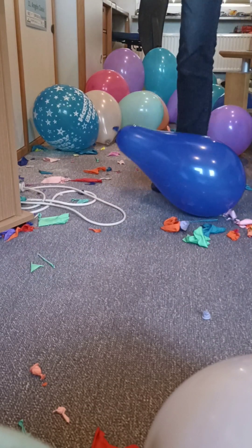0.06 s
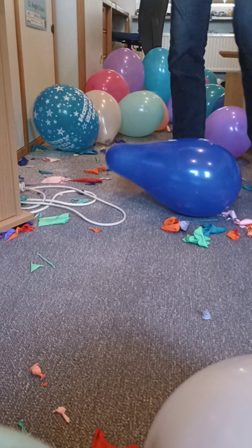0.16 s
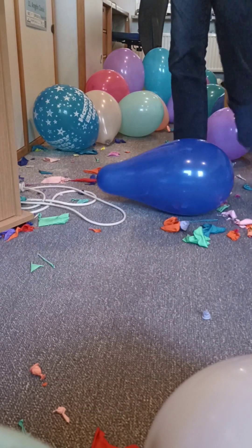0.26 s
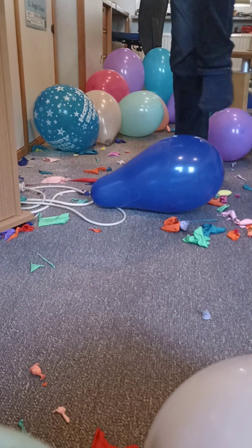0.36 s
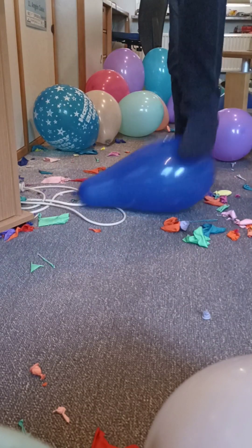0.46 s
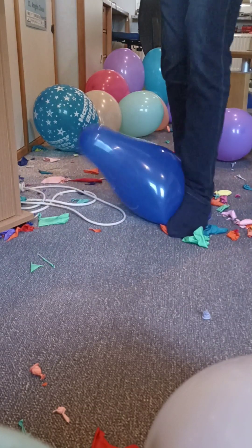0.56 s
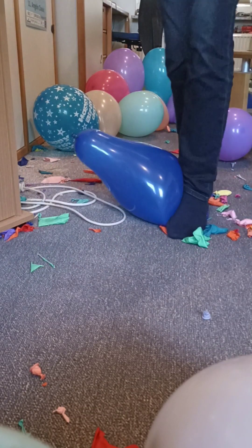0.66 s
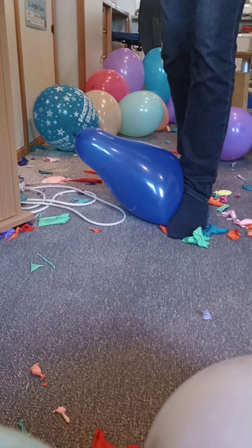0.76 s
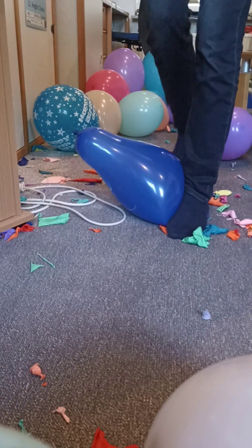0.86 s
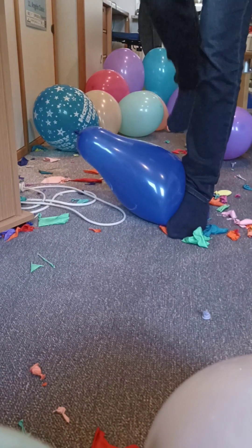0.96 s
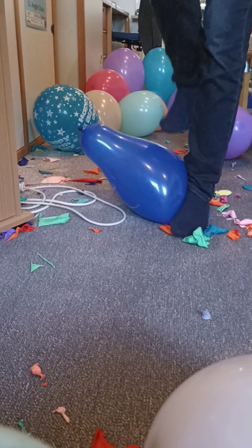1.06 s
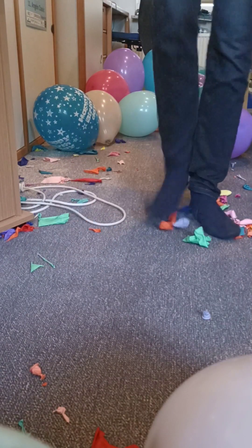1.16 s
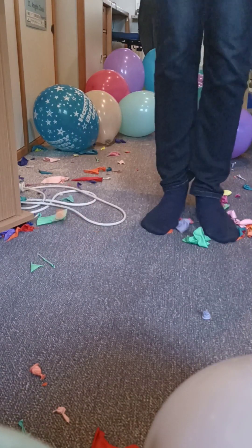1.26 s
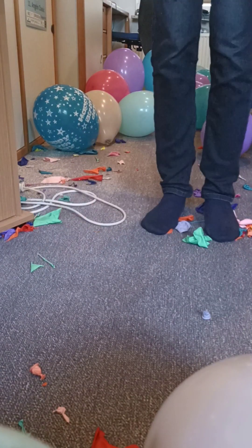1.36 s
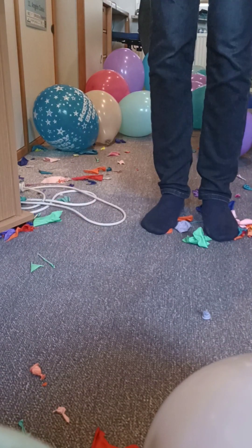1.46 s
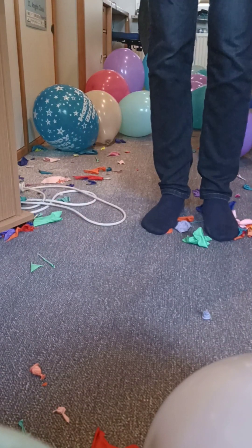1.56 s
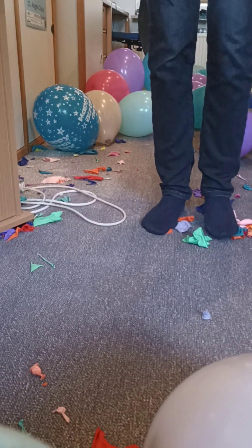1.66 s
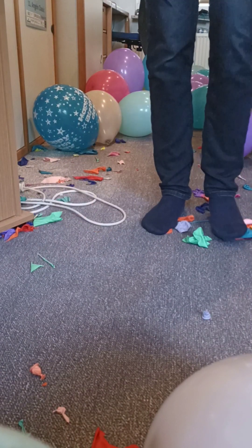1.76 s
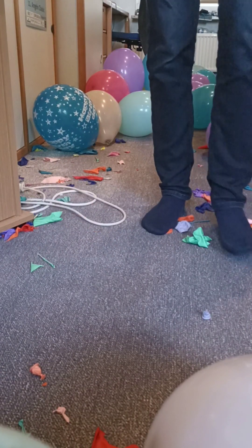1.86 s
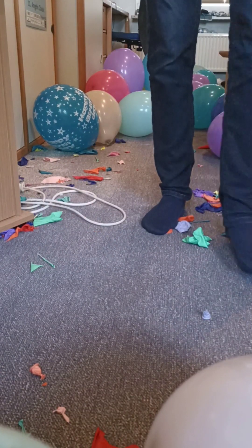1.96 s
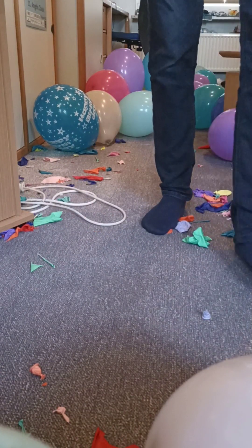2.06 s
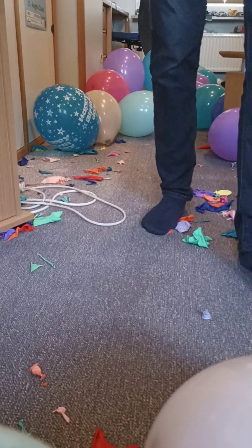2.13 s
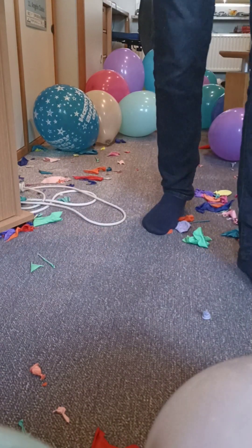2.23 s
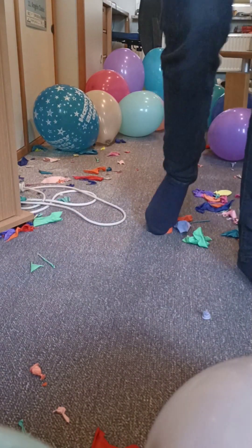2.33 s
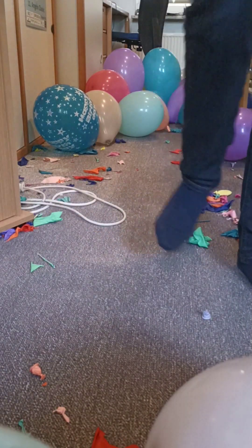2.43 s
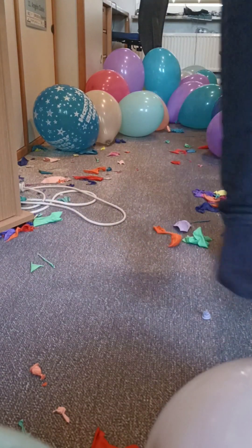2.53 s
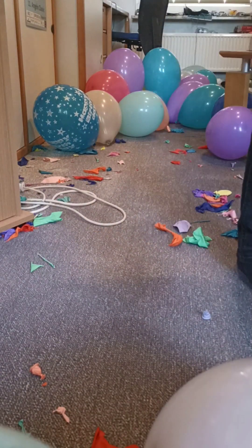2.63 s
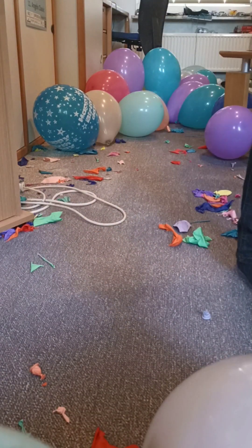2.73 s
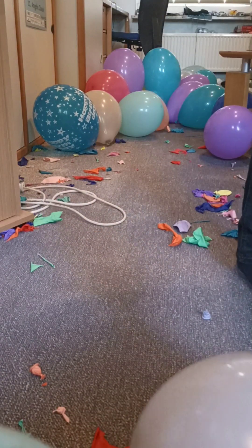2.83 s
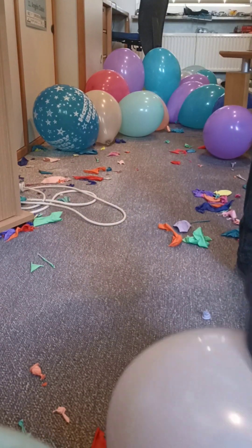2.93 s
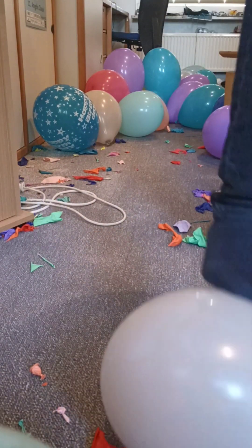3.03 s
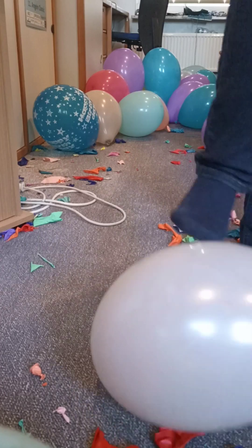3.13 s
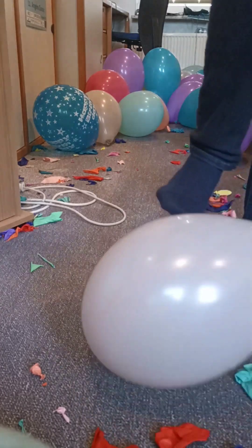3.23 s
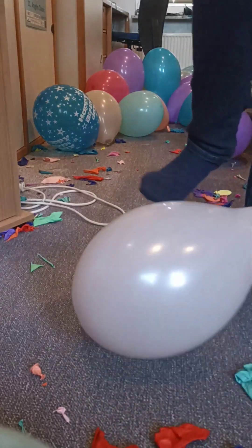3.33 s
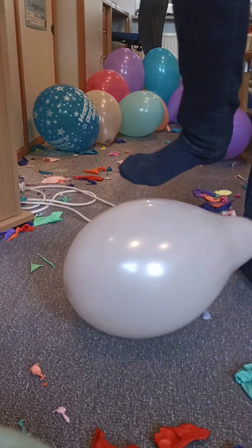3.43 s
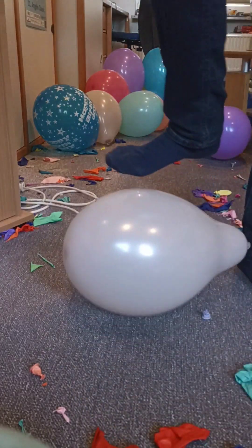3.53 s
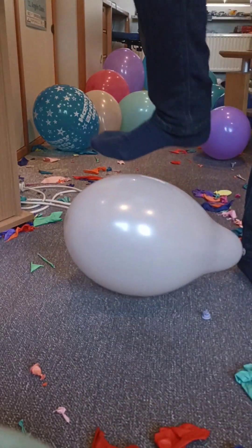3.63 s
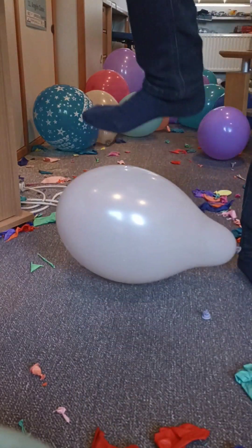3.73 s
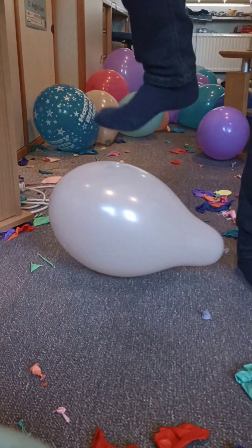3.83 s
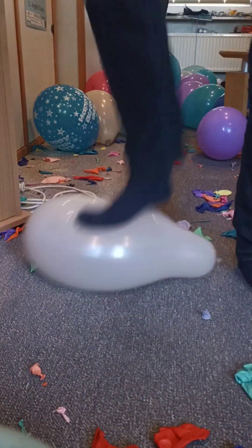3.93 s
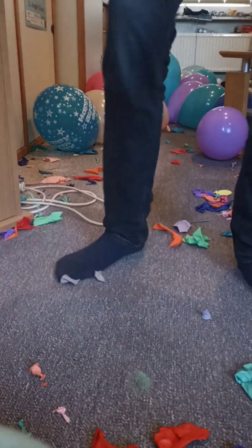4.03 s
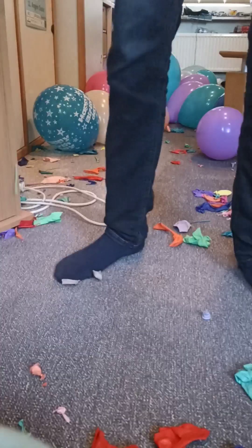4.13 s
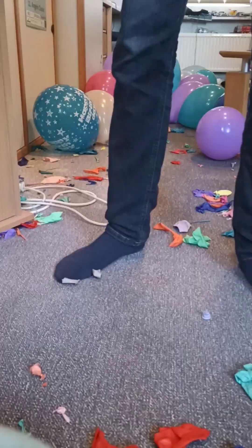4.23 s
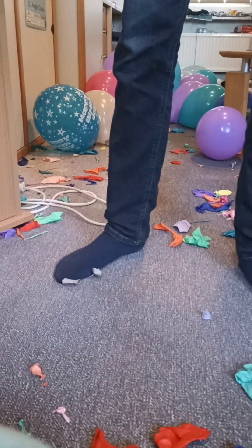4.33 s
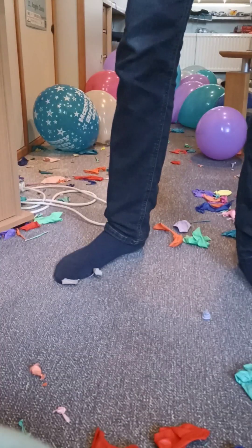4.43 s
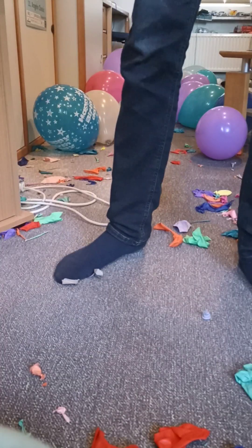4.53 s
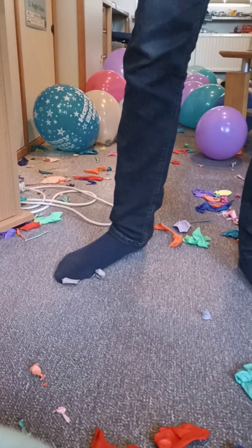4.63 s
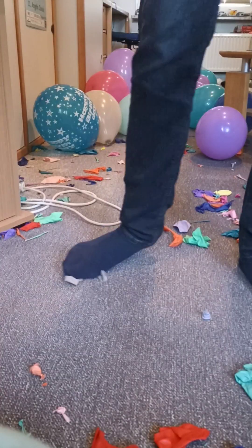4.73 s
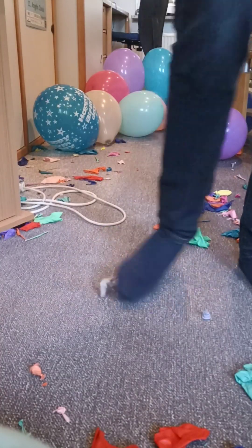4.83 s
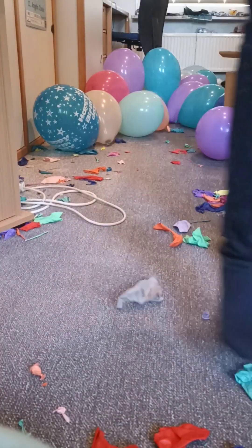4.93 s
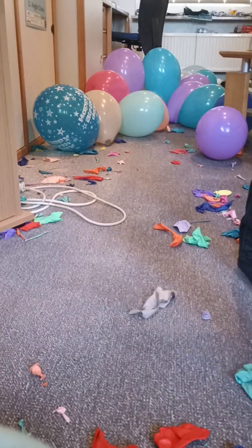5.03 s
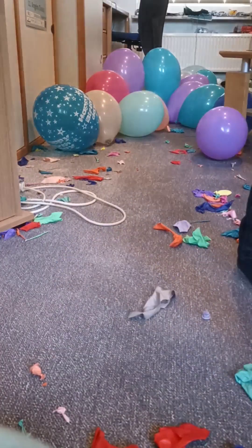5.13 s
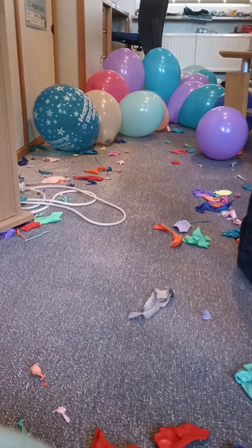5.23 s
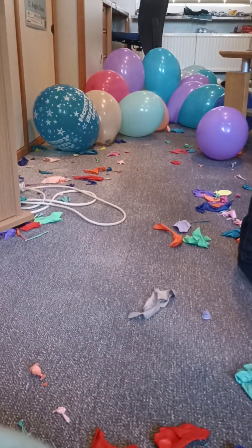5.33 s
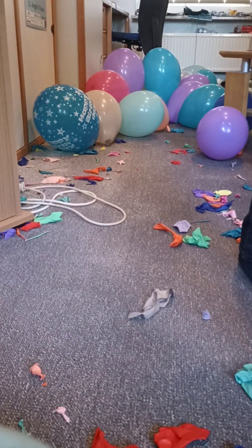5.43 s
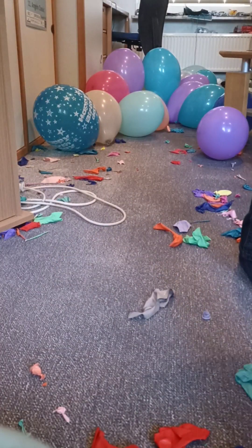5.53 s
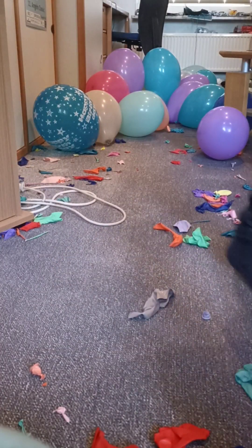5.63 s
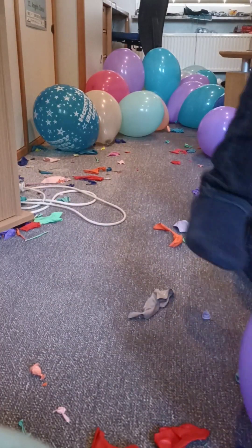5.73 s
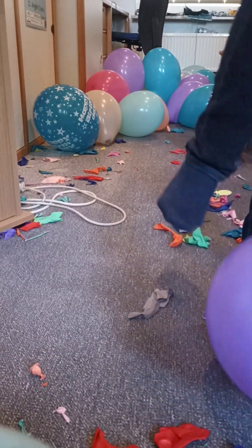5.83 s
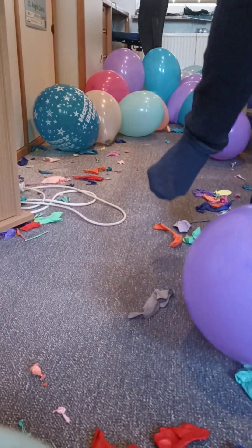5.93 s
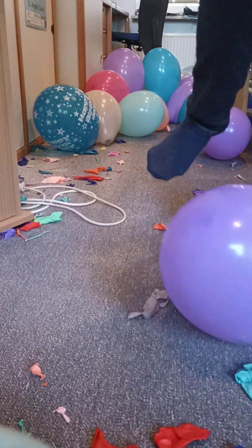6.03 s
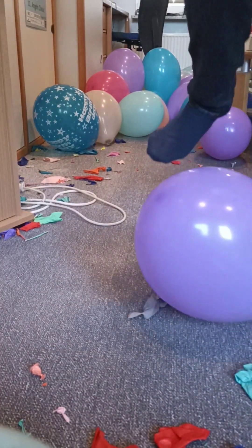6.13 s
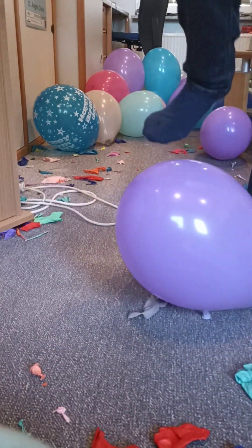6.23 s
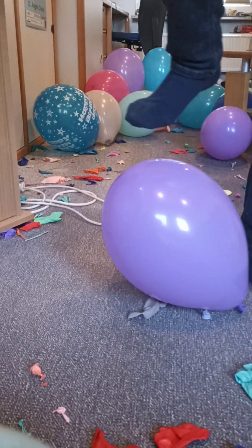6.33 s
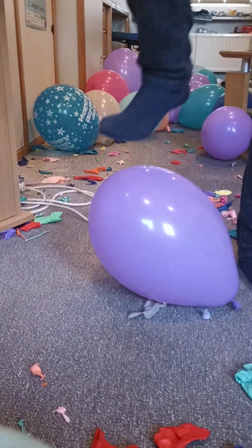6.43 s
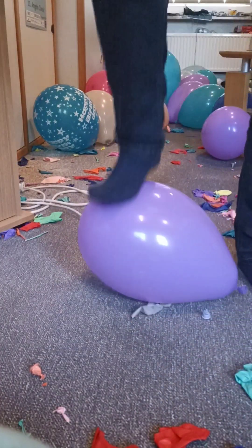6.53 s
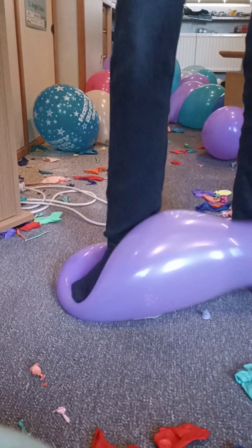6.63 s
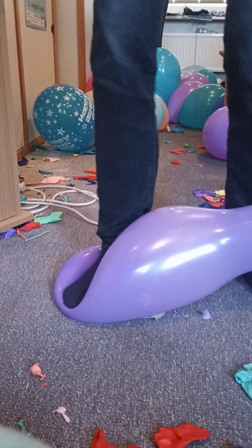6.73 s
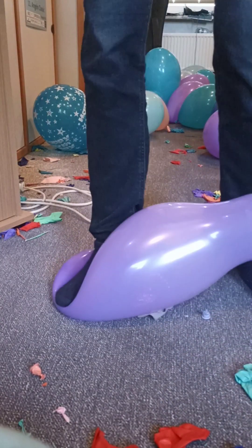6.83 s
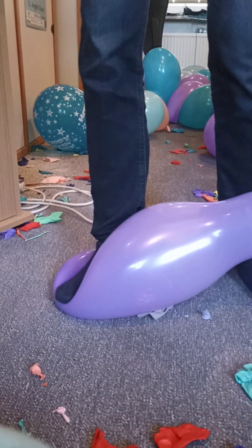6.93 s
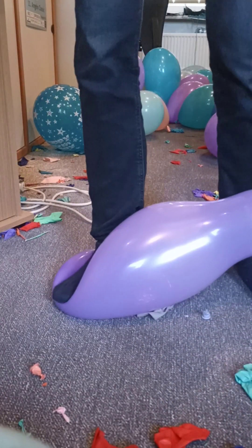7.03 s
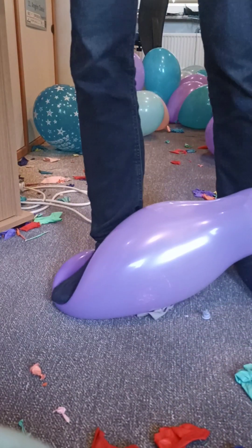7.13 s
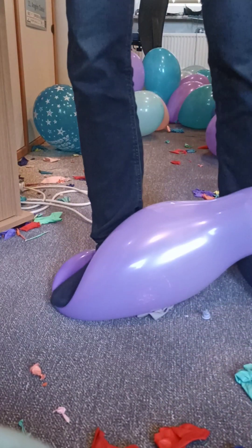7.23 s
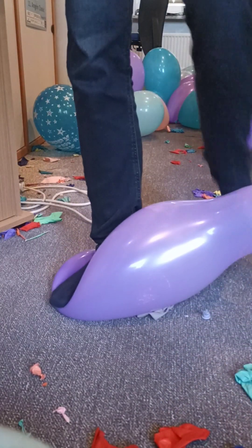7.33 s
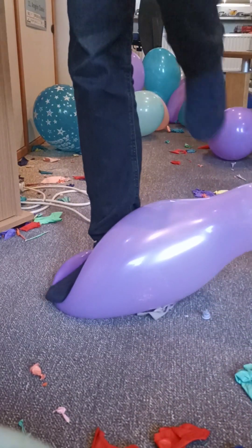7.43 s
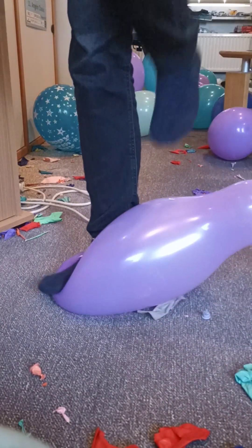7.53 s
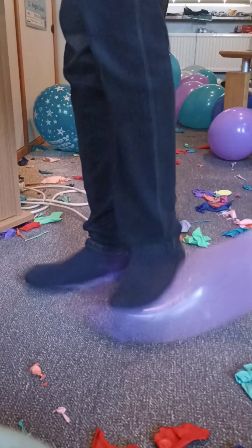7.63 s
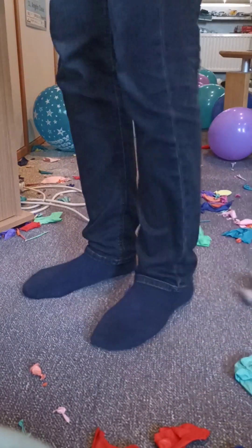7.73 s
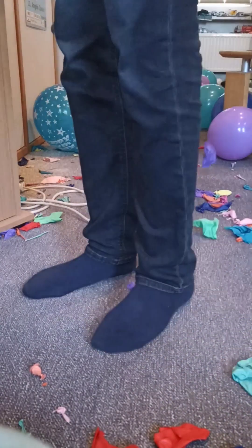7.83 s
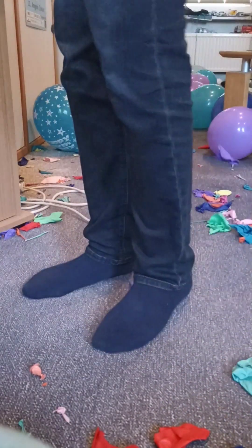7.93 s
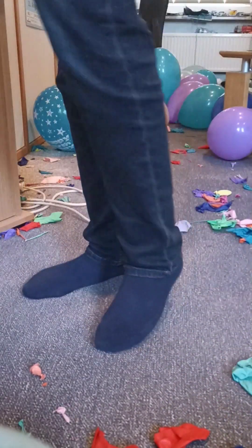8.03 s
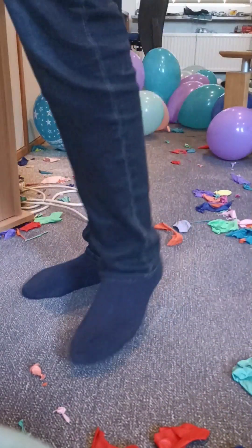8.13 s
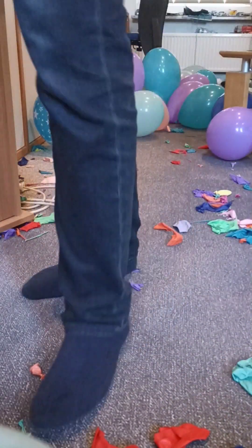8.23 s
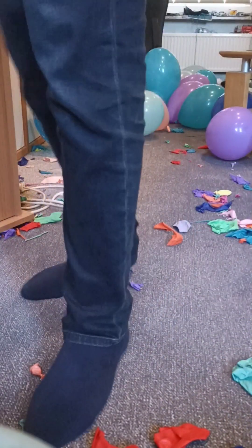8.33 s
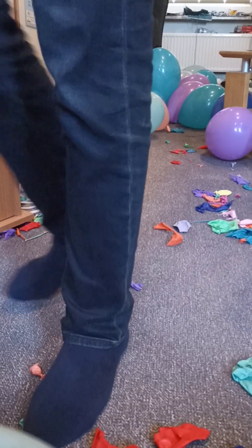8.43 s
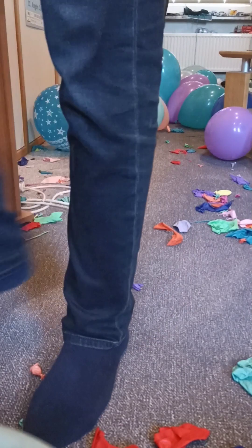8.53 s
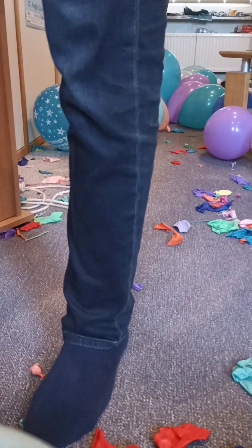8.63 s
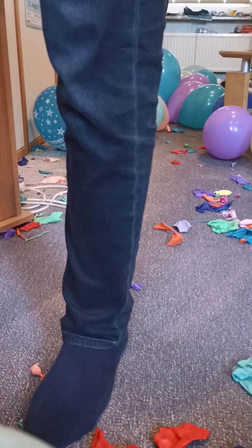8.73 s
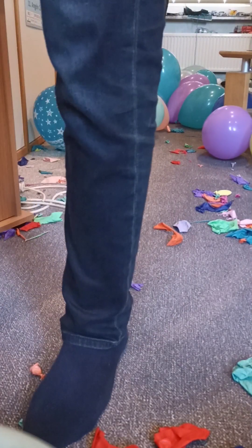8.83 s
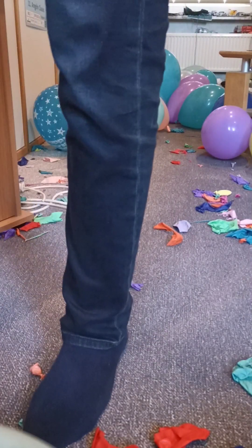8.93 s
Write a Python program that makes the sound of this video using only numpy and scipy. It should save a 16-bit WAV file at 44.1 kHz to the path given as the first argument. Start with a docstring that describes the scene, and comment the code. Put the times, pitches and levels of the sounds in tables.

```python
"""Three balloons trodden to bursting

A small carpeted room, heard by a microphone with two close ports: feet in socks tread on three balloons.
Blows are short booms with a slap of noise; dragged rubber and swishing cloth are trains of tiny jerks.
Each bang is a pressure step and a burst of room noise that overloads the input, and ringing tones
leave the other balloons humming. Single rubber snaps and a run of faint chirps lie over still air."""
import sys
import numpy as np
from scipy import signal
from scipy.fft import rfft, irfft
from scipy.io import wavfile
from scipy.ndimage import uniform_filter1d

SR = 44100
rng = np.random.default_rng(int(sys.argv[2]) if len(sys.argv) > 2 else 0)


def to_wav(sig):
    """Store sig (one row per channel, or 1-D mono) as 16-bit WAV at the path in sys.argv[1].

    Samples outside -1..1 are clipped; the rate is SR.
    """
    pcm = np.clip(np.atleast_2d(sig), -1, 1) * 32767
    pcm = np.round(pcm).astype(np.int16)
    wavfile.write(sys.argv[1], SR, pcm.T)  # frames by channels


N = 396459
TIME = np.arange(N) / SR

# Still air of the room: (frequency [Hz], level [dB])
HUSH_SPECTRUM = [(32, -40.5), (55, -13.5), (153, -1.5), (257, -9.5), (444, -8.5), (804, -19.5), (1890, -20),
                 (2510, -26.5), (3110, -21), (3760, -28), (8840, -36), (10900, -33), (12300, -27),
                 (16000, -34.5)]
# Decay of the late tail, before each source's damping: (frequency [Hz], time to fall 60 dB [s])
ROOM_DECAY = [(60, 0.31), (150, 0.61), (300, 0.5), (480, 0.48), (1000, 0.45), (3000, 0.43), (6000, 0.46),
              (15000, 0.26)]
# How alike the two ports hear diffuse sound: (frequency [Hz], left-right correlation [-1 to 1])
PORT_LIKENESS = [(30, 0.68), (110, .86), (300, 0.76), (450, 0.96), (650, 0.025), (1500, 0), (16000, 0.28)]
# Colour of the microphone ports: (frequency [Hz], left minus right [dB])
PORT_BALANCE = [(150, -0.5), (330, -1), (620, -6), (1150, 1.5), (2300, -3), (4500, -1.5), (8000, -5.5),
                (11000, 5.5), (15000, 7.5)]
# Socks and jeans brushing as a leg swings:
# (time at the fastest [s], spread [s], rustle before trim [dB], fizz [dB])
SWISHES = [(0.046, 0.022, -59, -72), (0.186, 0.059, -60.5, -76), (0.821, 0.017, -55, -48.5),
           (1.762, 0.028, -59, -80), (1.897, .04, -59.5, -81), (2.465, 0.04, -56.5, -56),
           (3.078, 0.082, -55, -60.5), (4.847, 0.049, -51.5, -65), (5.166, 0.13, -66.5, -74),
           (5.52, .09, -54.5, -59), (6.073, 0.013, -70.5, -66), (8.194, 0.013, -60, -52),
           (8.409, .04, -55.5, -66), (8.564, 0.19, -63.5, -76), (8.967, .04, -61.5, -63.5)]
# Rustle of the cloth: (frequency [Hz], level [dB])
CLOTH_SPECTRUM = [(200, 20.5), (600, 11.5), (1300, 10.5), (3200, 12.5), (4500, 8.5), (7000, 3),
                  (10500, -1.5), (12500, 3.5), (16000, -83.5)]
# Fizz of the finest fibres: (frequency [Hz], level [dB])
FIZZ_SPECTRUM = [(3000, -32), (7000, -8), (10500, -10.5), (12500, 2.5), (16000, -11)]
# Snaps of slipping rubber and scraps: (time [s], peak level [dB], centre frequency [Hz])
SNAPS = [(0.574, -22.5, 8000), (0.612, -30, 1510), (1.141, -16, 3220), (1.179, -25, 12400),
         (5.121, -36.5, 3370), (6.230, -49.5, 4000), (6.807, -31.5, 2000), (6.914, -23, 2680),
         (7.037, -26.5, 3170), (7.65, -37, 2500), (8.126, -35, 1780), (8.872, -38.5, 6000)]
# Strokes of rubber dragged under the foot:
# (time at full grip [s], build-up [s], hold [s], groan before trim [dB], creak before trim [dB])
RUBS = [(0.554, 0.0064, 0.16, -22.5, -42.5), (0.615, .006, 0.018, -38, -35.5),
        (0.924, 0.032, 0.28, -53.5, -64), (1.149, 0.016, 0.17, -29, -33.5), (1.887, .02, 0.48, -58, -70.5),
        (2.874, 0.00597, 0.084, -52, -60.5), (3.014, 0.062, 0.12, -49, -56),
        (3.971, 0.0019, 0.047, -32, -50.5), (4.041, 0.015, .004, -7.5, -30),
        (5.399, 0.0037, 0.069, -38, -54.5), (5.666, 0.15, .005, -43.5, -57),
        (6.592, .002, 0.084, -29.5, -49.5), (6.673, 0.012, 0.054, -19, -32.5),
        (6.816, 0.045, 0.13, -40.5, -45), (7.035, .04, 0.044, -41.5, -50), (7.166, 0.05, 0.1, -43.5, -55),
        (7.298, 0.041, 0.056, -43, -49.5), (7.629, 0.15, 0.016, -36, -45), (7.654, .003, 0.12, -15, -33.5),
        (8.483, 0.042, 0.43, -58, -72), (8.928, .01, .07, -47, -61.5)]
# Groan of the air in the balloon: (frequency [Hz], level [dB])
GROAN_SPECTRUM = [(40, -26), (85, -2), (250, 1), (470, -1), (620, -11), (850, -19.5), (2000, -47.5)]
# Creak of the balloon's skin: (frequency [Hz], level [dB])
SKIN_SPECTRUM = [(300, -18.5), (750, -3.5), (1100, 4.5), (1600, -2.5), (2300, -1), (3400, -3),
                 (3900, -10.5), (7000, -16), (10500, -16.5), (12500, -7), (16000, -22.5)]
# Blows of foot and balloon on the floor:
# (time [s], level [dB], pitch of the boom [Hz], slap against boom before trim [dB])
THUMPS = [(0.021, -39.5, 154, -6.5), (0.413, -45, 92, 3), (0.528, -25, 144, -0.5),
          (0.546, -13.5, 194, -3.5), (0.563, -9, 99.4, -2.5), (0.592, -21, 259, 4.5),
          (0.643, -13, 138, -10), (0.697, -19, 194, -8.5), (1.176, -16.5, 187, -20),
          (1.217, -12, 128.3, -3.5), (1.885, -42.5, 450, 2), (2.251, -43.5, 363, -18.5),
          (2.854, -37, 135.2, 5), (3.005, -44, 335.8, 2.5), (3.561, -39, 112, -6.5), (3.973, -24, 233, -3),
          (4.009, -12.5, 190, -4), (4.02, -9, 123, -6), (4.039, -9.5, 442, 1), (5.397, -27.5, 267, -7),
          (5.41, -19.5, 120.6, -9.5), (5.464, -23.5, 92, -8.5), (6.044, -38, 237.4, -0.5),
          (6.128, -44, 239, -1.5), (6.584, -23, 145, -7.5), (6.621, -13.5, 106, -10),
          (6.664, -10.5, 149, 4), (6.683, -2, 101.5, -9.5), (7.302, -33, 205, 1), (7.651, -8, 171.4, -3),
          (8.905, -31.5, 119, -4)]
# Slap on the carpet: (frequency [Hz], level [dB])
SLAP_SPECTRUM = [(25, -15.5), (60, -6.5), (100, 0), (200, 0.5), (450, -4.5), (600, -11), (800, -20.5),
                 (1300, -23.5), (3000, -41), (12000, -52)]
# Bursts: (time [s], level [dB], bass lift [dB], treble lift [dB], build-up of the room's boom [s],
# time the room stays full [s], ringing against the bang [dB])
BURSTS = [(1.2329, -4, 8, -1, 0.0022, 0.018, -8.5), (4.0539, -0.5, 1.5, -7, 0.052, 0.074, 3),
          (7.7076, 0.5, 0, -5, 0.014, 0.06, -1)]
# Noise of a bang: (frequency [Hz], level [dB])
BANG_SPECTRUM = [(45, -29.5), (110, -17), (240, -11), (330, -5), (460, 2), (600, -3.5), (720, -11.5),
                 (1200, -13.5), (2400, -17), (3150, -15), (4000, -20.5), (9500, -26.5), (12500, -21),
                 (16000, -29)]
# What rings on after a bang, the room briefly and the loose balloons for long:
# (frequency [Hz], relative level [dB], time to fall 60 dB [s])
RINGS = [(102, -24, 0.5), (153, -51, 5.3), (157, -50, 4.6), (158.4, -23, 0.8), (207.5, -44, 3.6),
         (234, -32, 1.1), (288, -48, 1.7), (303.7, -4.5, 0.58), (367, -29, 0.95), (408.5, -13.5, 0.56),
         (451, -9, .42), (480, -45.5, 1.1), (534, -15, 0.52), (767, -23, 0.39)]

HUSH_DB = -62
CHIRP_START_S, CHIRP_GAP_S = 1.615, 0.134
CHIRP_QUICKEN_S = 0.0045  # each next gap is this much shorter
CHIRP_DB, CHIRP_FADE_DB = -57, -0.74  # first chirp before the room, change from each to the next
RUB_RELEASE_S = 0.036  # a stroke dies away at this pace once the foot stops
LOW_MODE_HZ, LOW_MODE_WIDTH_HZ, LOW_MODE_DB = 101, 5.8, 0.5  # set booming by a heavy tread
CRACK_DB, CRACK_S = 2, 0.0012  # the pressure step of a bursting skin
FULL_SCALE, KNEE = 0.97, 6  # ceiling of the input and sharpness of its overload
EDGE_HZ = 15900  # upper band limit


def amp(db):
    """Decibels to gain."""
    return 10 ** (np.asarray(db) / 20)


def unit(x):
    """Scales to rms 1."""
    return x / np.sqrt(np.mean(x ** 2) + 1e-20)


def read(points, hz):
    """Joins (frequency [Hz], value) points on a log-frequency axis."""
    f, value = np.transpose(points)
    return np.interp(np.log(hz + 1), np.log(f + 1), value)


def add(mix, s, sound):
    """Lays a stereo sound into the mix at time s."""
    part = mix[:, max(round(s * SR), 0):][:, :sound.shape[1]]
    part += sound[:, :part.shape[1]]


def colour(x, points, size=4096):
    """Causal minimum-phase filter with the given (frequency [Hz], level [dB]) spectrum."""
    hz = abs(np.fft.fftfreq(size, 1 / SR))
    log_gain = np.log(amp(read(points, hz)))
    response = np.exp(np.conj(signal.hilbert(log_gain)))
    taps = np.fft.ifft(response).real[:size // 2]
    return signal.oaconvolve(x, taps[None], axes=1)[:, :x.shape[1]]


def air(size):
    """Diffuse noise at two close ports: alike in the bass, mostly unrelated higher up."""
    a, b = rfft(rng.standard_normal((2, size)))
    same = np.clip(read(PORT_LIKENESS, np.fft.rfftfreq(size, 1 / SR)), -1, 1)
    mid = a * np.sqrt((1 + same) / 2)
    side = b * np.sqrt((1 - same) / 2)
    return irfft([mid + side, mid - side], size)


def room(direct_db, build_s=0.00098, hold_s=0.005, damping=0.81, boom_hz=800, late_db=-15,
         early_speed=2.5, size=16384):
    """Response from one spot: direct sound, dense reflections, then a slower tail; the bass swells late."""
    hz, t, z = signal.stft(air(size), SR, nperseg=256)
    hz = hz[:, None]
    held_t = (t ** 4 + hold_s ** 4) ** (1 / 4) - hold_s  # the decay hardly starts before hold_s
    late = np.exp(-np.log(1000) * held_t * damping / read(ROOM_DECAY, hz))
    # the carpet soon takes all that does not run between the walls
    fade = late ** early_speed + amp(late_db) * late
    swell = 1 - np.exp(-(t / build_s) ** 2) / (1 + (hz / boom_hz) ** 2)
    reflections = signal.istft(z * fade * swell, SR, nperseg=256)[1][:, :size]
    response = unit(reflections) / np.sqrt(size)
    response[:, 0] += amp(direct_db)
    return response


def echo(x, response):
    """Plays a sound through a room response."""
    return signal.oaconvolve(x[None], response, axes=1)[:, :N]


def slips(per_s, spread_db, clump_db):
    """Stick-slip: a random train of tiny jerks whose size drifts in clumps, a few much larger than the rest."""
    clumps = unit(uniform_filter1d(rng.standard_normal(N), 700))
    size = amp(spread_db * np.minimum(rng.exponential(1, N), 4) + clump_db * clumps)
    happens = rng.random(N) < per_s / SR
    return size * rng.choice([-1, 1], N) * happens


def hush():
    """Still air of the room: steady diffuse noise, strongest in the bass."""
    return amp(HUSH_DB) * unit(colour(air(N), HUSH_SPECTRUM))


def chirps(foot_hz=2700, arch_hz=380, waver_hz=270, size=1200, count=7):
    """Short, hoarse chirps: a tone arches up in pitch and back with a random waver; the run quickens and fades."""
    out = np.zeros((2, N))
    arch = np.sin(np.linspace(0, np.pi, size))
    for k in range(count):
        s = CHIRP_START_S + k * CHIRP_GAP_S - CHIRP_QUICKEN_S * k * (k - 1) / 2
        waver = unit(uniform_filter1d(rng.standard_normal(size), 16))
        hz = foot_hz + arch_hz * arch + waver_hz * waver
        call = np.sqrt(abs(arch)) * np.sin(2 * np.pi * np.cumsum(hz) / SR)
        level = amp(CHIRP_DB + k * CHIRP_FADE_DB)
        add(out, s, level * echo(call, room(direct_db=2, damping=2.55)))
    return out


def swishes(rustle_trim_db=-2):
    """Fibres catch on each other in a fine, dense crackle that swells and fades with each swing of a leg."""
    fibres = echo(slips(per_s=2000, spread_db=6.0, clump_db=-3.5), room(direct_db=-5.5))
    gains = np.zeros((2, N))
    for s, spread_s, rustle_db, fizz_db in SWISHES:
        swing = np.exp(-((TIME - s) / spread_s) ** 2 / 2)
        gains += amp([[rustle_db], [fizz_db]]) * swing
    rustling, fizzing = gains
    rustle = unit(colour(fibres, CLOTH_SPECTRUM))
    fizz = unit(colour(fibres, FIZZ_SPECTRUM))
    return amp(rustle_trim_db) * rustling * rustle + fizzing * fizz


def snaps(skirt_db=-11):
    """One sudden slip of taut rubber: a click around one pitch, with the room behind it."""
    out = np.zeros((2, N))
    for s, db, hz in SNAPS:
        peak = [(hz / 10, 2 * skirt_db), (hz / 2, skirt_db), (hz, 0), (2 * hz, skirt_db)]
        click = colour(room(direct_db=-3.5, damping=1.6), peak)
        add(out, s, amp(db) * click / abs(click).max())
    return out


def stroke(s, build_s, hold_s):
    """Gain over time of one rub: the grip builds up, holds, and lets go."""
    before = np.minimum(TIME - s, 0)
    after = np.maximum(TIME - s - hold_s, 0)
    return np.exp(before / build_s - after / RUB_RELEASE_S)


def rubbing(groan_trim_db=-3, creak_trim_db=-1):
    """Latex sticks and slips on sock and carpet, shaking the air inside and crackling on the skin."""
    jerks = slips(per_s=900, spread_db=3.5, clump_db=2.4)
    groan = unit(colour(echo(jerks, room(direct_db=2.5)), GROAN_SPECTRUM))
    creak = unit(colour(echo(jerks, room(direct_db=-4.0)), SKIN_SPECTRUM))
    power = np.zeros((2, N))
    for s, build_s, hold_s, groan_db, creak_db in RUBS:
        power += (amp([[groan_db], [creak_db]]) * stroke(s, build_s, hold_s)) ** 2
    groaning, creaking = np.sqrt(power)
    return amp(groan_trim_db) * groaning * groan + amp(creak_trim_db) * creaking * creak


def thumps(slap_trim_db=-1, boom_s=0.012):
    """Squashed air in a balloon bounces a few cycles, its skin slaps the carpet; deep blows wake a room mode."""
    out = np.zeros((2, N))
    t = np.arange(SR // 4) / SR
    for s, db, hz, hard_db in THUMPS:
        boom = np.sin(2 * np.pi * hz * t) * np.exp(-t / boom_s) * (1 - np.exp(-2 * hz * t))
        slap = colour(room(direct_db=-2.0, damping=0.47), SLAP_SPECTRUM)
        add(out, s, amp(db) * np.tile(boom, (2, 1)))
        add(out, s, amp(db + hard_db + slap_trim_db) * slap / abs(slap).max())
    mode_filter = signal.iirpeak(LOW_MODE_HZ, LOW_MODE_HZ / LOW_MODE_WIDTH_HZ, SR)
    low_mode = signal.lfilter(*mode_filter, out)
    # a small source radiates little deep bass
    return colour(out + amp(LOW_MODE_DB) * low_mode, [(25, -11), (50, -8.5), (85, -1)])


def pops(ring_s=3):
    """The skin rips in about a millisecond; the pressure step floods the room and sets its modes ringing."""
    out = np.zeros((2, N))
    t = np.arange(ring_s * SR) / SR
    crack = amp(CRACK_DB) * (1 - t / CRACK_S) * np.exp(-t / CRACK_S)  # overpressure, then suction
    ring = np.zeros(len(t))
    for hz, db, t60 in RINGS:
        decay = np.exp(-np.log(1000) * t / t60)
        ring += amp(db) * decay * np.sin(2 * np.pi * (hz * t + rng.random()))
    for s, db, bass_db, treble_db, build_s, hold_s, ring_db in BURSTS:
        response = room(direct_db=-21.5, build_s=build_s, hold_s=hold_s, boom_hz=860, size=32768)
        bang = colour(response, BANG_SPECTRUM)
        bang /= np.sqrt(np.mean(bang[:, :SR // 10] ** 2))  # rms 1 over the first 0.1 s
        tilt = [(200, bass_db), (350, 0), (1300, 0.0045), (3000, treble_db)]
        add(out, s, amp(db) * colour(bang, tilt))
        ringing = amp(db + ring_db) * ring * (1 - np.exp(-t / build_s))
        add(out, s, np.tile(crack + ringing, (2, 1)))
    return out


def scene():
    """All sources over the quiet of the room."""
    return hush() + chirps() + swishes() + snaps() + rubbing() + thumps() + pops()


def record(dry, lag_s=0.00014):
    """Each port has its own colour and the right one hears later; loud peaks overload; then the band limit."""
    left = colour(dry[:1], [(hz, db / 2) for hz, db in PORT_BALANCE])[0]
    right = colour(dry[1:], [(hz, -db / 2) for hz, db in PORT_BALANCE])[0]
    ports = np.array([left, np.roll(right, round(lag_s * SR))])
    clipped = ports / (1 + abs(ports / FULL_SCALE) ** KNEE) ** (1 / KNEE)
    band_limit = signal.firwin(511, EDGE_HZ, window=("kaiser", 9), fs=SR)
    return signal.oaconvolve(clipped, band_limit[None], "same")


dry = scene()
out = record(dry)
to_wav(out)
```